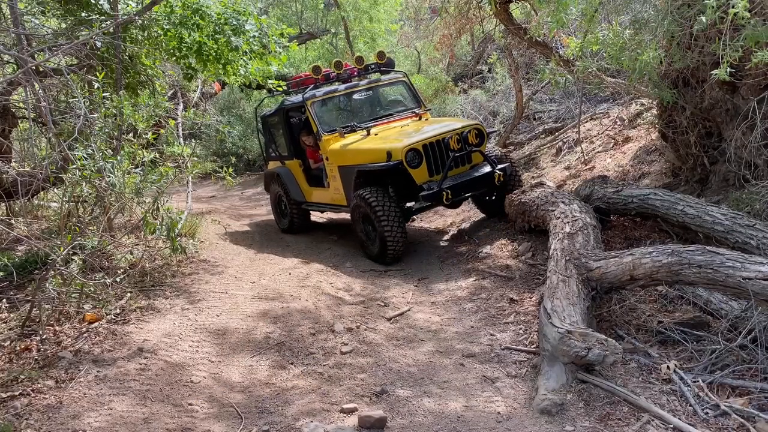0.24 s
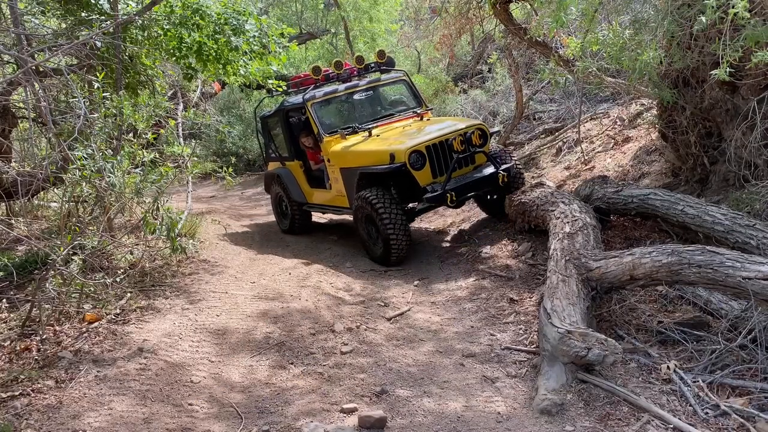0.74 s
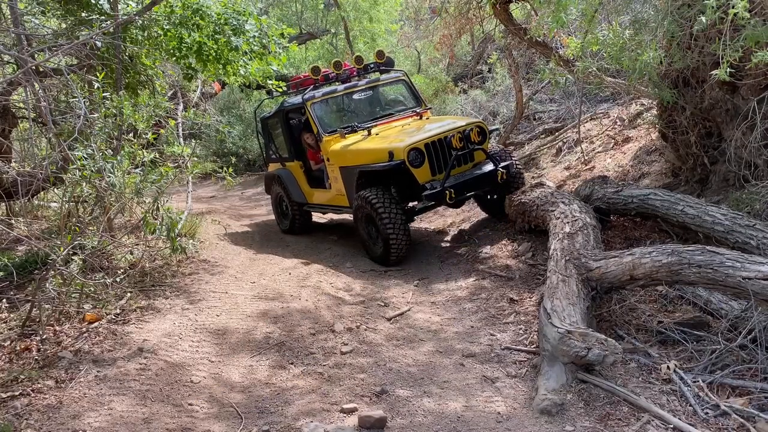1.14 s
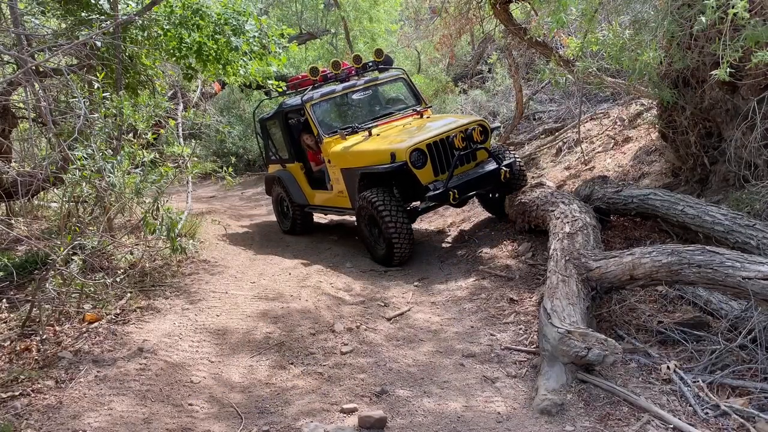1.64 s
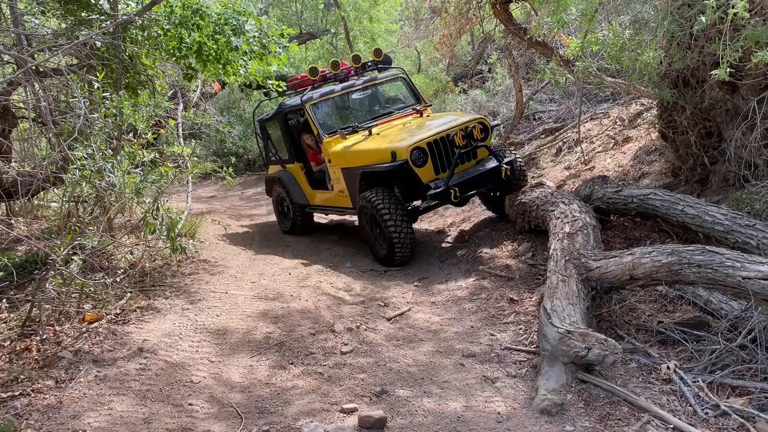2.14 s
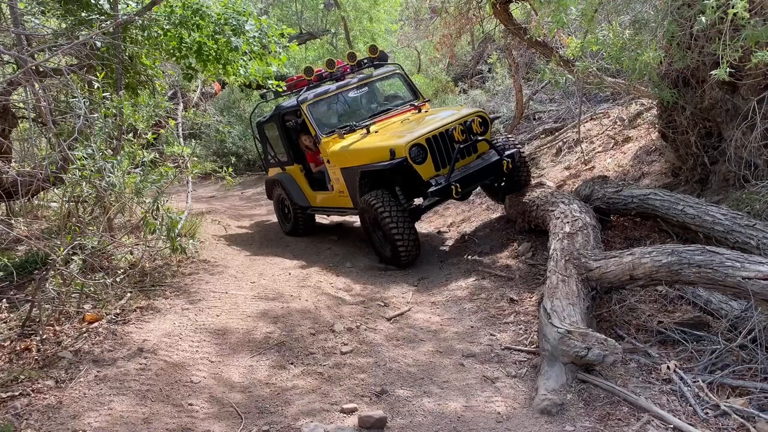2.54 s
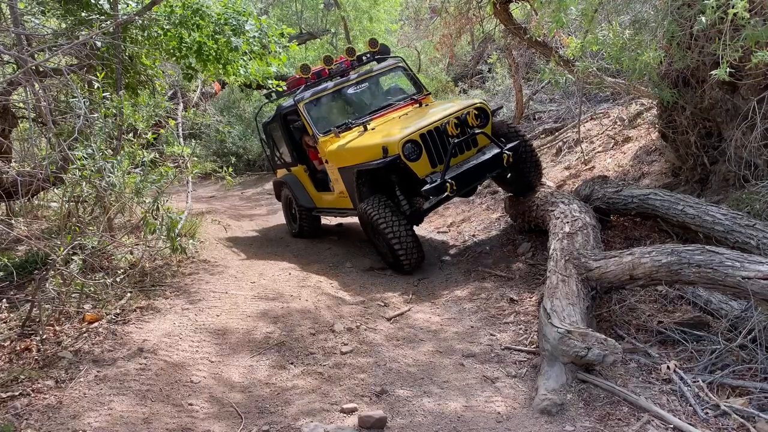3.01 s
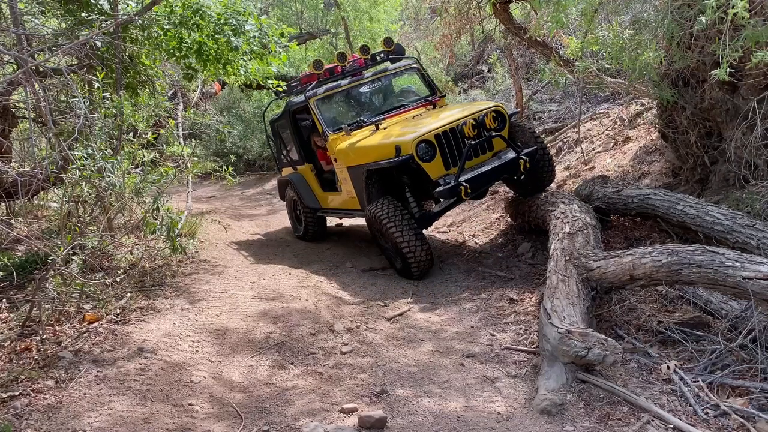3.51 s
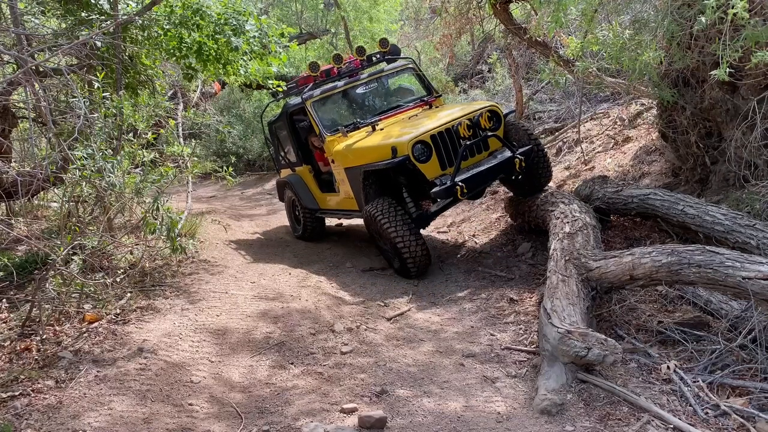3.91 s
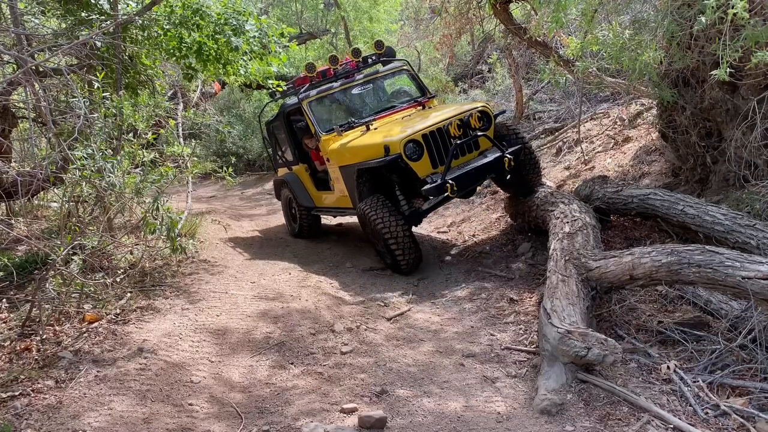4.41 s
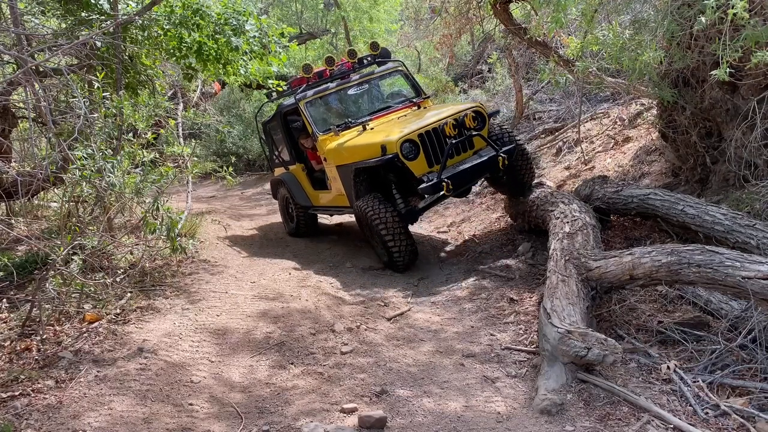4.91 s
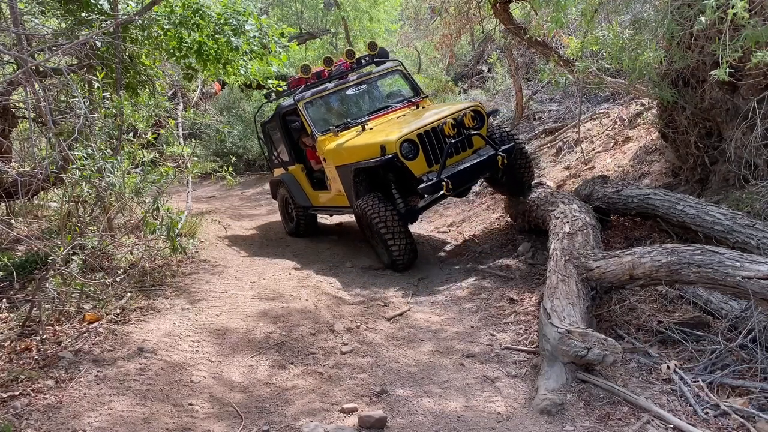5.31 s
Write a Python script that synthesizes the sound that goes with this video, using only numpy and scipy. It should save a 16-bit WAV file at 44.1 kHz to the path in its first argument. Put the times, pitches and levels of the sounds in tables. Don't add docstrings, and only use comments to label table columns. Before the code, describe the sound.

Low, steady engine lugging on a brushy dirt trail, heard from the front by a near stereo microphone. Dull wooden knocks lead to hollow tread scraping and a cluster of sharp twig cracks. After lift-off only soft idle rumble and mechanical hiss remain; then a strong rev rises, peaks and drops with slight pops.

```python
import sys
import numpy as np
from scipy import signal
from scipy.fft import rfft, irfft, next_fast_len
from scipy.io import wavfile
from scipy.ndimage import uniform_filter1d

SR = 44100
rng = np.random.default_rng(int(sys.argv[2]) if len(sys.argv) > 2 else 0)


def nominal_scale(level):
    x = np.asarray(level, float) / 20
    return 10 ** x


def put_to_file(sound):
    columns = np.atleast_2d(sound).T
    safe = np.clip(columns, -1, 1)
    whole_steps = np.round(safe * 32767)
    wavfile.write(sys.argv[1], SR, whole_steps.astype(np.int16))


N = 244755
T = np.arange(N) / SR

# (time [s], bank rate [Hz])
SPEED = [(0, 27.6), (.25, 31.18), (.51, 35.58), (.85, 34.82), (1.39, 33.03), (1.82, 33.98), (2.3, 36.08),
         (2.58, 34.64), (3.43, 27.5), (3.59, 27.2), (3.71, 34.32), (3.88, 47.48), (4.11, 54.02),
         (4.53, 56.87), (4.84, 57.64), (4.95, 53.8), (5.21, 41.82), (5.55, 40.0)]
# (time [s], level under a full pull [dB])
THROTTLE = [(0, -5), (.2, -4.5), (.38, -1), (1.3, -1.5), (2.28, 0.2), (2.44, -4.5), (2.57, -23),
            (3.33, -25), (3.39, -8.5), (3.55, -13.5), (3.66, -0.4), (3.76, 0.5), (3.88, -.3), (4.39, -2.5),
            (4.55, 1.5), (4.82, -1), (4.93, -10), (5.55, -19)]
# (centre [s], half width [s], throttle rise [dB])
BURBLES = [
    (5.21, 0.027, 10),
    (5.42, 0.037, 9.5),
    (2.6, 0.034, 6.5),
    (3.6, .03, 6.5),
]
# (full-pull level [dB], throttle share [dB/dB], speed slope [dB/octave], surge [dB per octave/s])
ORDER_LAW = [(-9, 0.97, 0.2, 0.36), (-20.5, 0.34, -8.5, -0.2), (-21, 0.21, -3.5, 1)]
PIPE_PHASE = [(2, 0), (3, -1.2), (4, -1.9)]
# (frequency [Hz], gain [dB])
PIPE_GAIN = [(54, -8), (62, -0.5), (69, 0.7), (80, 1.5), (100, -3), (125, -4), (160, 0.2), (230, -11.5)]
# (order [-], level relative to it [dB])
FAINT_ORDERS = [(1, -30), (5, -46)]
CYLINDER_OFFSETS = [-1.3, .4, .1, -.5, .8, .5]
# (frequency [Hz], width [Hz], level [dB])
MUFFLER_MODES = [(85, 57, 6.5), (134, 83, -1), (207, 360, -21.5)]
# (order [-], start [s], end [s], level [dB])
PASSING_ORDERS = [(6, -.1, .35, -36), (6, 2.55, 2.95, -39), (6, 3.3, 3.62, -27), (6, 3.68, 3.88, -34),
                  (5, 3.82, 4.35, -34), (5, 4.3, 4.9, -38), (4 / 3, 4.15, 4.66, -30), (1, 4.3, 4.8, -38),
                  (1, 4.82, 5.2, -31), (3.2, 5.15, 5.5, -30), (10 / 3, 2.45, 3.05, -33),
                  (7 / 3, 4.4, 4.95, -28), (5, 2.95, 3.25, -34), (4, 5.25, 5.65, -29), (4, 3.88, 4.15, -31),
                  (3, -.1, .22, -28), (4, 2.45, 2.78, -31)]
# (bank rate [Hz], body [dB], clatter [dB], hiss [dB])
BAY_LAW = [(27.5, -43.5, -46, -60.5), (34.9, -38.5, -41.5, -56), (46, -37.5, -36.5, -54),
           (57.5, -35, -35.5, -51.5)]
BAY_SHARES = [.03, .02, 0.044]
# (centre [s], half width [s], body [dB], clatter [dB], hiss [dB])
BAY_SWELLS = [
    (1.67, 0.17, 2.5, 3.3, -3.5),
    (2.13, 0.13, 3.5, 3.4, 4.5),
    (2.8, 0.54, 0.75, 2, -0.7),
    (3.7, 0.12, 3.3, 0.54, 3),
    (3.88, 0.23, 2.2, 2.7, 1.5),
    (4.3, .15, .3, .8, 1.5),
    (4.85, .12, .6, 1.8, 1.2),
]
BAY_CENTRES = [600, 2100, 7500]
# (frequency [Hz], density [dB per Hz])
RUSH_SPECTRUM = [(200, -2.5), (300, -5), (400, -9), (700, -9), (1200, -14.5), (1900, -20), (2400, -23),
                 (3400, -25), (3700, -30), (6500, -35.5), (8500, -37.5), (10000, -33.5), (12500, -52),
                 (15500, -45)]
# (frequency [Hz], width [Hz], level over body [dB])
PANEL_MODES = [(471.7, 14.7, -9), (587, 15.5, -5.5), (1176, 150, -11.5), (1748, 160, -18.5),
               (1890, 220, -10.5), (3060, 360, -30), (123.3, 19.6, 6.5)]
# (order [-], start [s], end [s], level [dB])
WHINES = [(42.6, .22, .38, -45), (42.0, .38, 1.09, -45), (41.8, 1.15, 1.55, -48), (58.6, .86, 1.1, -45.5),
          (58.6, 1.05, 1.3, -51), (58.4, 1.4, 1.8, -51), (25.2, .4, 1.2, -50), (16.8, .45, 1.3, -43),
          (101, .65, 1.15, -62), (144, .7, 1.1, -63), (151, 1.2, 1.6, -64), (42.3, 2.08, 2.27, -47),
          (155, .8, 1.3, -64.5), (38, 2.45, 2.9, -53), (50, 2.65, 2.95, -54), (50, .85, 1.2, -54)]
# (start [s], end [s], centre [Hz], width [Hz], level [dB])
SCRAPES = [
    (1.812, 2.23, 690, 600, -35),
    (2.21, 2.44, 690, 200, -34.5),
    (1.3, 1.72, 550, 390, -42),
    (1.6, 1.74, 1430, 1100, -40.5),
    (3.6, 3.8, 380, 260, -39),
    (1.2, 2.2, 900, 1000, -47.5),
]
# (time [s], peak level [dB], centre [Hz])
KNOCKS = [(.187, -26, 750), (1.168, -29, 1100), (1.650, -28, 1200), (1.708, -28, 1300), (1.7475, -23, 1900),
          (1.7695, -19, 1100), (1.7700, -28, 2500), (1.8315, -26, 900), (1.8310, -27, 2300),
          (2.288, -30, 680), (5.383, -25, 1400), (5.419, -27, 800)]
# (time [s], edge level [dB], body over edge [dB])
SNAPS = [(0.733, -35, -7), (2.0249, -34.5, 4), (2.05, -35.5, -14), (2.08, -30, -20), (2.0767, -29.5, -4),
         (2.0844, -40.5, 7.5), (2.125, -35.5, 4.5), (2.1625, -33, -13), (2.1843, -36.5, 1),
         (2.206, -37.5, -6), (2.2179, -30, -4), (2.472, -30.5, -11), (3.175, -41, -3)]
# (start [s], end [s], grains [-], level [dB])
CRUSH = [
    (2.015, 2.25, 90, -44),
    (2.46, 2.485, 16, -40),
    (.73, .75, 10, -46),
]
# (frequency [Hz], level relative to direct [dB])
DIFFUSE_GAIN = [(60, -47.5), (110, -23.5), (200, -19.5), (380, -20), (700, -13), (1300, -12), (2400, -14),
                (4400, -9), (7000, -10.5), (15000, -7)]
# (frequency [Hz], lead of the left port [rad])
PORT_LEAD = [(0, 0), (6700, -.2), (7400, -1.3), (8150, -2.3), (8550, -3.14), (9000, -4.3), (9700, -6.1),
             (10900, -6.8), (11600, -8.3), (11800, -9.3), (12250, -9.55), (12500, -10.6), (13200, -11.9),
             (14500, -13.5), (15500, -15.7)]


def throttle():
    pedal_db = columns(THROTTLE)[0]
    return pedal_db + sum(db * swell(s, width_s) for s, width_s, db in BURBLES)


def order_levels(hz, pull_db):
    octaves = np.log2(hz / 35)
    rising = np.gradient(octaves) * SR
    shut_db = np.clip(-pull_db - 0.5, 0, 16)
    orders_db = []
    for (db, share, slope, surge), (k, phase) in zip(ORDER_LAW, PIPE_PHASE):
        source_db = db + share * pull_db + slope * octaves + surge * rising
        dropout_db = 0.33 * shut_db * abs(walk(14))
        orders_db.append(source_db + at_hz(PIPE_GAIN, k * hz) - dropout_db)
    lump_db = -34.5 - 0.17 * pull_db
    return orders_db, lump_db


def exhaust(turn, orders_db, lump_db):
    boom = 0
    for db, (k, phase) in zip(orders_db, PIPE_PHASE):
        boom = boom + nominal_scale(db + 0.24 * walk(19)) * np.cos(k * turn + phase)
    for k, db in FAINT_ORDERS:
        boom = boom + nominal_scale(orders_db[0] + db + 2.5 * walk(8)) * np.cos(k * turn)
    firing = (turn / np.pi).astype(int)
    stray = .45 * rng.standard_normal(N // 100)[firing]
    pulses = np.diff(firing, prepend=0) * (np.take(CYLINDER_OFFSETS, firing % 6) + stray)
    lumps = sum(nominal_scale(db) * unit(band(pulses, hz, width_hz, order=2)) for hz, width_hz, db in MUFFLER_MODES)
    return np.sqrt(2) * boom + nominal_scale(lump_db) * unit(lumps)


def locked(table, turn, wobble_rad, fade_s=.06):
    out = np.zeros(N)
    for k, start_s, end_s, db in table:
        on = slice(max(int(start_s * SR), 0), int(end_s * SR))
        fade = np.clip(np.minimum(T[on] - start_s, end_s - T[on]) / fade_s, 0, 1)
        tone = np.sqrt(2) * np.sin(k * turn[on] + wobble_rad * walk(30)[on])
        out[on] += fade * nominal_scale(db + 2 * walk(10)[on]) * tone
    return out


def bay_levels(hz, pull_db):
    fan_lag_s = 0.19
    pole = np.exp(-1 / (fan_lag_s * SR))
    fan_hz = hz[0] + signal.lfilter([1 - pole], [1, -pole], hz - hz[0])
    rate, *laws = np.transpose(BAY_LAW)
    levels_db = np.array([np.interp(np.log(fan_hz), np.log(rate), law) for law in laws])
    swells_db = sum(np.outer(added, swell(s, width_s)) for s, width_s, *added in BAY_SWELLS)
    return levels_db + np.outer(BAY_SHARES, pull_db) + swells_db


def engine_bay(turn, levels_db):
    bursts = nominal_scale(1.17 * rng.exponential(size=N // 40 + 1)).repeat(40)[:N]
    grit = unit(rng.standard_normal(N) * bursts)
    ticking = grit * (1 + 0.037 * np.cos(turn))
    size = next_fast_len(N)
    f = np.maximum(np.arange(size // 2 + 1) * SR / size, 1)
    coloured = rfft(ticking, size) * nominal_scale(at_hz(RUSH_SPECTRUM, f) - 13.5) * (f > 150)
    swing_db = [db - db.mean() for db in levels_db]
    out, shared = 0, walk(12)
    for step in range(-1, 20):
        place = np.interp(np.log(200 * 2 ** (step / 3)), np.log(BAY_CENTRES), [0, 1, 2])
        load_db = sum(max(1 - abs(place - k), 0) * db for k, db in enumerate(swing_db))
        share = np.clip(1 - abs(3 * np.log2(f / 200) - step), 0, 1)
        flicker_db = 0.61 * shared + walk(20)
        out = out + nominal_scale(load_db + flicker_db) * irfft(coloured * share, size)[:N]
    for hz, width_hz, db in PANEL_MODES:
        ring = unit(band(rng.standard_normal(N), hz, width_hz))
        out = out + nominal_scale(levels_db[0] + db + 2.0 * walk(4.98)) * ring
    return out


def scrape():
    out = 0
    for start_s, end_s, hz, width_hz, db in SCRAPES:
        grip = np.sin(np.pi * np.clip((T - start_s) / (end_s - start_s), 0, 1))
        rub = unit(band(rng.standard_normal(N), hz, width_hz, order=2))
        out = out + grip * nominal_scale(db + 2.4 * walk(60)) * rub
    return out


def knock(s, db, hz):
    out, t = np.zeros(N), np.arange(900) / SR
    envelope = np.e * t * hz * np.exp(-t * hz)
    start = int(s * SR)
    out[start:start + 900] = nominal_scale(db) * envelope * np.sin(2 * np.pi * hz * t)
    return out


def crack(s, db, hz, width_hz, decay_s):
    out, t = np.zeros(N + 2000), np.arange(2000) / SR
    noise = rng.standard_normal(2000) * t * np.exp(-t / decay_s)
    burst = band(noise, hz, width_hz, order=2)
    start = int(s * SR)
    out[start:start + 2000] = nominal_scale(db) * burst / abs(burst).max()
    return out[:N]


def debris():
    out = sum(knock(*row) for row in KNOCKS)
    for s, edge_db, body_db in SNAPS:
        out = out + crack(s, edge_db - .6, 7600, 9000, 0.0017)
        out = out + crack(s, edge_db + body_db + 2.0, 2720, 1800, 0.0023)
    return out


def crush():
    clicks = np.zeros(N)
    for start_s, end_s, grains, db in CRUSH:
        when, size, sign = rng.random((grains, 3)).T
        at = ((start_s + (end_s - start_s) * when) * SR).astype(int)
        clicks[at] = nominal_scale(db - 5 * np.log(size + .02)) * np.sign(sign - .5)
    return band(clicks, 7000, 9000, order=2)


def scatter(direct):
    length, decay_s = 8192, .045
    tail = unit(rng.standard_normal(length) * np.exp(-np.arange(length) / SR / decay_s)) / np.sqrt(length)
    size = next_fast_len(N + length)
    f = np.arange(size // 2 + 1) * SR / size
    spectrum = rfft(direct, size) * rfft(tail, size) * nominal_scale(at_hz(DIFFUSE_GAIN, f))
    return irfft(spectrum, size)[:N]


def unit(x):
    return x / np.sqrt(np.mean(x ** 2))


def band(x, hz, width_hz, order=1):
    edges = [max(hz - width_hz / 2, 10), min(hz + width_hz / 2, .49 * SR)]
    return signal.sosfilt(signal.butter(order, edges, "bandpass", fs=SR, output="sos"), x)


def walk(rate):
    k = int(SR / rate)
    held = np.repeat(rng.standard_normal(N // k + 1), k)
    return uniform_filter1d(uniform_filter1d(held, k), k)[:N]


def swell(s, width_s):
    return np.exp(-((T - s) / width_s) ** 2)


def at_hz(table, hz):
    f, v = np.transpose(table)
    return np.interp(np.log(np.maximum(hz, 1)), np.log(np.maximum(f, 1)), v)


def columns(table):
    s, *cols = np.transpose(table)
    return [np.interp(T, s, c) for c in cols]


def scene():
    hz = uniform_filter1d(columns(SPEED)[0], size=4000)
    turn = 2 * np.pi * np.cumsum(hz) / SR
    pull_db = throttle()
    engine = exhaust(turn, *order_levels(hz, pull_db)) + locked(PASSING_ORDERS, turn, wobble_rad=.3)
    bay = engine_bay(turn, bay_levels(hz, pull_db)) + locked(WHINES, turn, wobble_rad=.9)
    log = scrape() + debris() + crush()
    direct = engine + bay + log
    side = scatter(direct)
    return np.array([direct + side, direct - side])


def top_cut(x):
    return signal.sosfilt(signal.butter(12, 15680, fs=SR, output="sos"), x)


def record(dry):
    size = next_fast_len(N + 8192)
    f = np.arange(size // 2 + 1) * SR / size
    lead = np.interp(f, *np.transpose(PORT_LEAD)) / 2
    phase = np.exp(1j * np.array([lead, -lead]))
    cuts = (f < 15600) * f ** 2 / (f ** 2 + 30.0 ** 2)
    x = irfft(rfft(dry, size) * phase * cuts, size)[:, :N]
    mix = np.tanh(.5 * x) / .5
    return top_cut(mix)


dry = scene()
out = record(dry)
put_to_file(out)
```